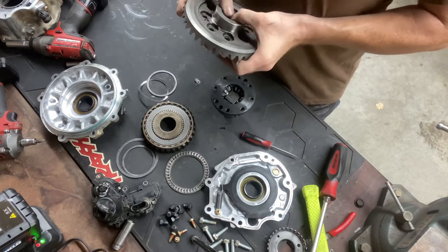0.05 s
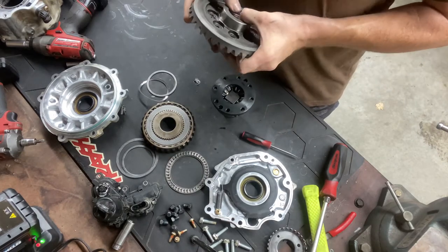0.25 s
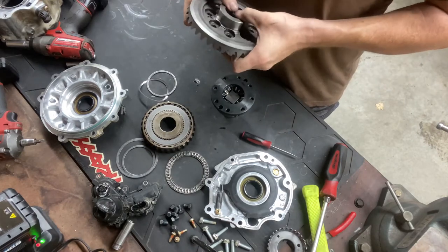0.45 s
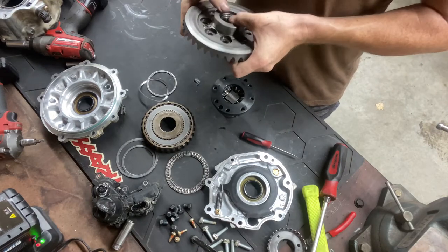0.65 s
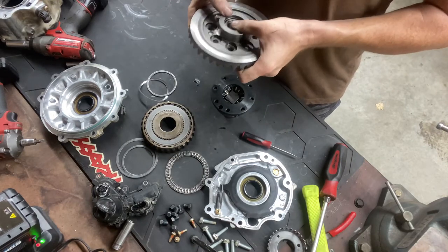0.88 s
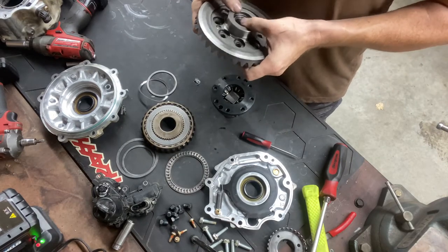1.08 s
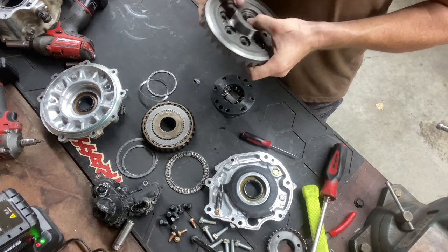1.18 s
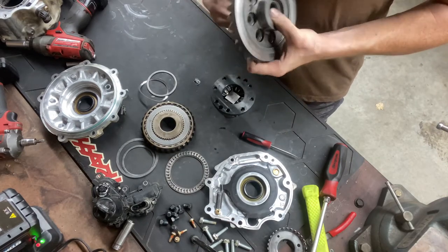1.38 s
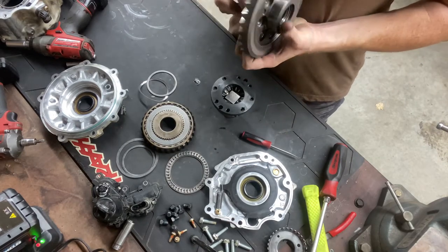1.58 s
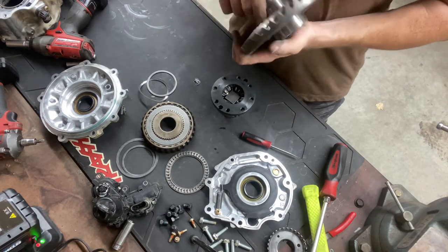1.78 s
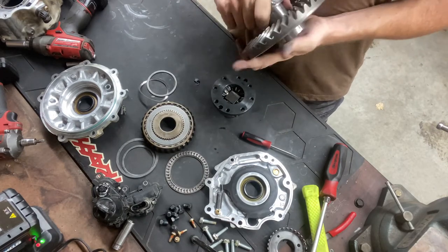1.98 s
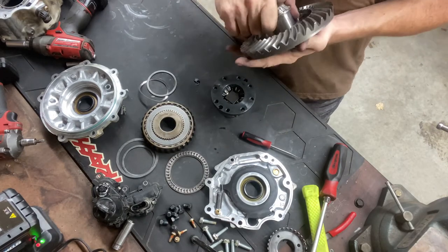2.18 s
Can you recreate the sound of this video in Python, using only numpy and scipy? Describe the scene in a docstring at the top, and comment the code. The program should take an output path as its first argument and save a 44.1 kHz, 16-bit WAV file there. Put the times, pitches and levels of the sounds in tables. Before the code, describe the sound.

Steel gear parts clink sharply with a quick ringing rattle, then clink again as one is pressed into place. Fingers rub faintly on the metal afterwards, while a fan hisses and hums softly in a slightly echoing workshop.

```python
"""In a workshop, a small steel gear drops into a heavy ring gear held in the hands, bounces quickly to
rest, and is then pressed home on its seat with a second clink. The impacts tick and excite damped
modes of the steel, which echo in the room. Fingers rub the steel afterwards, with a faint stick-slip
squeak. Behind, a fan hisses, two nearly equal hums beat against each other, and a low drone recedes."""
import sys
import numpy as np
from scipy import signal
from scipy.fft import rfft, irfft
from scipy.io import wavfile
from scipy.ndimage import uniform_filter1d

SR = 44100
rng = np.random.default_rng(int(sys.argv[2]) if len(sys.argv) > 2 else 0)


def bounce(signal):
    """Save signal as a 16-bit WAV file at the path given by the first command-line argument."""
    frames = np.transpose(np.atleast_2d(signal))
    limited = np.clip(frames, -1, 1)
    pcm = np.round(limited * 32767).astype(np.int16)
    wavfile.write(sys.argv[1], SR, pcm)


N = 99225

# Impacts: (time [s], tick level [dB], then the level [dB] of each mode group: small gear low, middle
# and high tone, ring gear, seat, long ring of the small gear); None = not excited
CONTACTS = [(.1980, None, None, None, None, -47, None, None),
            (.2112, -12, -7.5, -20.5, -7, -30, None, -37.5),
            (.2178, -6, -34.5, -27.5, -14.5, -28, None, None),
            (.2233, -15.5, -14.5, -9, -13.5, -30, None, None),
            (.2276, -23, -8, -16.5, -11, -32, None, None), (.2315, -27, -7.5, -13.5, -17, -43, None, None),
            (.2341, -19, -4.5, -19, -21, -31, None, None), (.2367, -11, -13.5, -28, -24, -29, None, None),
            (.2394, -22, -15.5, -27, -28.5, -45, None, None),
            (.2426, -34, -18.5, -34, -29, -29.5, None, None),
            (.2470, -29, -21.5, -22.5, -31.5, -35, None, None),
            (.3890, None, None, None, None, -50, None, None),
            (.6325, None, None, None, None, -31.5, None, None),
            (.6350, -27, -24.5, -29.5, -41, -36, None, -63),
            (.6428, -13.5, -30.5, -27, -55, -57.5, -23.5, None),
            (.6485, -34, -39, -50, -55, None, -21.5, None)]


def undb(db):
    """Amplitude ratio of a level in decibels."""
    return 10 ** (np.asarray(db) / 20)


def colour(x, points):
    """Spectral shaping by (frequency [Hz], level [dB]) points; white noise keeps its rms."""
    hz, db = np.array(points, float).T
    bin_hz = np.arange(len(x) // 2 + 1) * SR / len(x) + 1
    gain = undb(np.interp(np.log(bin_hz), np.log(hz), db))
    return irfft(rfft(x) * gain, len(x)) / np.sqrt(np.mean(gain ** 2))


def fade(since, t60):
    """Exponential decay from since = 0, falling 60 dB in t60 seconds."""
    return (since >= 0) * np.exp(-np.log(1000) * np.maximum(since, 0) / t60)


def walk(rate_hz):
    """Slow random fluctuation: smoothed noise of unit standard deviation."""
    width = int(SR / rate_hz)
    smooth = uniform_filter1d(uniform_filter1d(rng.standard_normal(N), width), width)
    return smooth / smooth.std()


def fan(level_db=-54, flicker_db=1.51):
    """Broadband fan noise under random amplitude modulation: each octave flickers independently."""
    # Fan spectrum: (frequency [Hz], relative level [dB])
    fan_spectrum = [(15, -48.5), (25, -19.5), (97, -3), (130, -6.5), (181, -10), (243, -8), (355, -11.5),
                    (479, -11), (548, -16), (801, -22), (943, -23.5), (1020, -23), (2300, -31.5),
                    (5630, -29), (7000, -33.5), (7590, -25), (9170, -44.5), (11100, -38), (16200, -47.5)]
    spectrum = rfft(colour(rng.standard_normal(N), fan_spectrum))
    hz = np.arange(N // 2 + 1) * SR / N + 1
    octave = np.clip(np.log2(hz / 40), 0, 9)
    bands = (irfft(spectrum * np.maximum(1 - abs(octave - k), 0), N) for k in range(10))
    return undb(level_db) * sum(band * undb(flicker_db * walk(rate_hz=9)) for band in bands)


def hum(t, hz=123.96, beat_hz=3.9, level_db=-59, lower_db=-1.5):
    """Beating: two close tones interfere, so their sum swells at the difference frequency."""
    # Overtones of the upper hum: (harmonic number, relative level [dB])
    harmonics = [(2, -10.5), (4, -7.5)]
    cycles = hz * t + rng.random()
    upper = np.sin(2 * np.pi * cycles)
    lower = undb(lower_db) * np.sin(2 * np.pi * (cycles - beat_hz * t))
    overtones = sum(undb(db + 3.0 * walk(rate_hz=7.7)) * np.sin(2 * np.pi * m * cycles)
                    for m, db in harmonics)
    return np.sqrt(2) * undb(level_db) * (upper - lower + overtones)


def rumble(t, centre_hz=69.46, skirt_hz=16):
    """Narrow-band noise, heard as a low drone that recedes."""
    # Drone envelope: (time [s], level [dB])
    envelope = [(0, -61), (1.3, -60.5), (1.6, -75.5), (2.25, -72.5)]
    times, db = np.array(envelope).T
    band = [(centre_hz - skirt_hz, -40), (centre_hz, 0), (centre_hz + skirt_hz, -40), (200, -90)]
    return undb(np.interp(t, times, db)) * colour(rng.standard_normal(N), band)


def room(x, t, level_db=-24.5, t60=0.63, onset_s=0.0049):
    """Diffuse reverberation: convolution with noise that builds up quickly and decays exponentially."""
    # Echo spectrum: (frequency [Hz], relative level [dB])
    spectrum = [(300, -1.5), (1500, 4), (5000, -2.5), (9000, -6), (16000, -8)]
    echo = colour(rng.standard_normal(N), spectrum) * fade(t, t60) * (1 - np.exp(-t / onset_s))
    return undb(level_db) * signal.fftconvolve(x, echo / np.sqrt(np.sum(echo ** 2)))[:N]


def finger_squeak(t, jitter=0.0027, flicker_db=6):
    """Stick-slip friction: a finger slips almost periodically, and only high harmonics carry."""
    # Course of the squeak: (time [s], slip rate [Hz], level [dB])
    course = [(1.2, 1030, -99), (1.23, 1040, -79), (1.28, 1140, -79), (1.31, 1165, -79.5),
              (1.33, 1225, -78.5), (1.35, 1265, -79), (1.39, 1330, -76), (1.42, 1290, -72),
              (1.44, 1230, -77.5), (1.49, 1100, -89.5)]
    # Squeak overtones: (harmonic number, relative level [dB])
    harmonics = [(9, -14), (10, 2.5), (11, 0), (12, -12)]
    times, slip_hz, level_db = np.array(course).T
    cycles = np.cumsum(np.interp(t, times, slip_hz) * (1 + jitter * walk(rate_hz=88))) / SR
    tones = sum(undb(db + flicker_db * np.minimum(walk(rate_hz=25), 1)) * np.sin(2 * np.pi * m * cycles)
                for m, db in harmonics)
    sliding = (t > times[0]) * (t < times[-1])
    return sliding * undb(np.interp(t, times, level_db)) * tones


def finger_rubs(t, grain_db=1.7):
    """Friction noise: fingers slide over steel in grainy strokes that swell and fade."""
    # Finger strokes: (start [s], duration [s], level [dB])
    strokes = [(0, 0.11, -68), (1.123, 0.5, -82), (1.437, 0.11, -71), (1.679, 0.11, -62),
               (1.744, 0.14, -62.5), (1.943, 0.077, -61.5), (1.98, 0.14, -68.5)]
    # Friction spectrum: (frequency [Hz], relative level [dB])
    spectrum = [(1200, -29), (2000, -5), (3200, -22), (5300, -18), (5520, 3), (5750, -9), (7800, -6),
                (9000, -10), (11000, 1), (12500, -10), (14500, -10), (16000, -21)]
    envelope = sum(undb(db) * np.sin(np.pi * np.clip((t - start) / duration, 0, 1) ** 0.71)
                   for start, duration, db in strokes)
    return envelope * undb(grain_db * walk(rate_hz=200)) * colour(rng.standard_normal(N), spectrum)


def touches(t):
    """Heavily damped impacts: soft knocks of steel on steel give brief noise around one frequency."""
    # Knocks: (time [s], level [dB], centre [Hz], roll-off [dB/octave], t60 [s])
    knocks = [(0.1976, -35, 3200, 14, 0.046), (.2065, -41, 4910, 4, 0.033), (.3870, -47, 2010, 9.5, 0.063),
              (0.632, -39, 2000, 10, .02), (0.6415, -36, 904, 5, 0.07), (1.618, -52.5, 6000, 7, 0.022)]
    return sum(colour(undb(db) * fade(t - start, t60) * rng.standard_normal(N),
                      [(hz * 2. ** k, -rolloff * abs(k)) for k in range(-4, 5)])
               for start, db, hz, rolloff, t60 in knocks)


def ticks(t, crack_t60=0.0077, clatter_t60=0.04, clatter_db=-16.5):
    """Impact transients: a broadband crack, then a quieter clatter of densely overlapping modes."""
    # Crack spectrum: (frequency [Hz], relative level [dB])
    crack_spectrum = [(200, -15.5), (600, -17.5), (1500, -16), (3000, -3), (4200, -11.5), (5000, 2.5),
                      (7000, 1), (8500, -13), (9500, -18.5), (11000, -20.5), (14000, -17.5), (16000, -27.5)]
    # Clatter spectrum: (frequency [Hz], relative level [dB])
    clatter_spectrum = [(200, -24.5), (600, -17), (1500, -9), (3000, -6), (4200, -6.5), (5500, 0.5),
                        (7000, -8.5), (8500, -12), (9500, -32.5), (11000, -18), (14000, -13),
                        (16000, -26.5)]
    hits = [(start, db) for start, db, *_ in CONTACTS if db is not None]
    crack, clatter = (sum(undb(db) * fade(t - start, t60) for start, db in hits) * rng.standard_normal(N)
                      for t60 in (crack_t60, clatter_t60))
    return colour(crack, crack_spectrum) + undb(clatter_db) * colour(clatter, clatter_spectrum)


def gear_ringing(t, attack_s=0.0007):
    """Damped free vibration: each impact restarts the decay of the modes it excites at a new level."""
    # Natural frequencies [Hz], one row per mode group in the order of CONTACTS
    mode_hz = [(5891, 5986, 5670, 6190, 5140, 6790), (8212, 8075, 7320),
               (13954, 13505, 13876, 12780, 14690), (1134, 2417, 3830, 1820, 2910, 3480),
               (3164, 1208, 1224, 1280, 1620, 2423, 7775, 7820, 5523, 6019, 12750, 8597, 3690, 15690),
               (5902, 5879, 5928, 6026, 8213, 13955, 2417, 1134)]
    # Strength and damping of the same modes: (relative level [dB], t60 [s])
    mode_decays = [
        [(1, 0.056), (-20, 0.11), (-18, 0.048), (-17, .03), (-18.5, .04), (-19, 0.0506)],
        [(0, 0.073), (-15, 0.11), (-18, 0.0413)],
        [(-0.5, 0.077), (-8.5, 0.055), (-9, 0.055), (-27, 0.06), (-28.5, .05)],
        [(-3, 0.15), (-3, .2), (-3, .07), (-4.5, .05), (-6, .05), (-1.5, 0.064)],
        [(0.5, 0.13), (-1, 0.04), (-22, .25), (-23, 0.24), (-20.5, 0.12), (-11.5, 0.34), (-2.5, 0.046),
         (-26.5, 0.29), (-20, 0.14), (-16, 0.096), (-27, 0.11), (-25, 0.1), (-19, 0.089), (-29, .1)],
        [(-3, 0.64), (-8.5, .8), (-10.5, .5), (-8, 0.33), (-2.5, 0.65), (-2.5, .5), (-8, 0.77), (-13, .6)],
    ]
    pole = np.exp(-1 / (attack_s * SR))
    sound = 0
    for column, (frequencies, decays) in enumerate(zip(mode_hz, mode_decays), start=2):
        hits = [(contact[0], contact[column]) for contact in CONTACTS if contact[column] is not None]
        times, hit_db = np.array([(0, -200)] + hits).T  # silent until first struck
        latest = np.searchsorted(times, t, side="right") - 1
        for hz, (mode_db, t60) in zip(frequencies, decays):
            envelope = undb(hit_db[latest] + mode_db) * fade(t - times[latest], t60)
            envelope = signal.lfilter([1 - pole], [1, -pole], envelope)  # rounds each attack
            sound = sound + envelope * np.sin(2 * np.pi * (hz * t + rng.random()))
    return sound


def scene():
    """Superposition of the steel, its echo, the fingers and the background at one microphone."""
    t = np.arange(N) / SR
    steel = gear_ringing(t) + ticks(t) + touches(t)
    return (steel + room(steel, t) + finger_rubs(t) + finger_squeak(t) + fan() + hum(t) + rumble(t))[None]


def record(dry):
    """Band limiting: the microphone cuts the deep bass and the highest treble."""
    low_cut = signal.butter(N=4, Wn=55, btype="high", fs=SR, output="sos")
    high_cut = signal.ellip(N=10, rp=.2, rs=90, Wn=15850, fs=SR, output="sos")
    return signal.sosfilt(high_cut, signal.sosfilt(low_cut, dry))


dry = scene()
out = record(dry)
bounce(out)
```